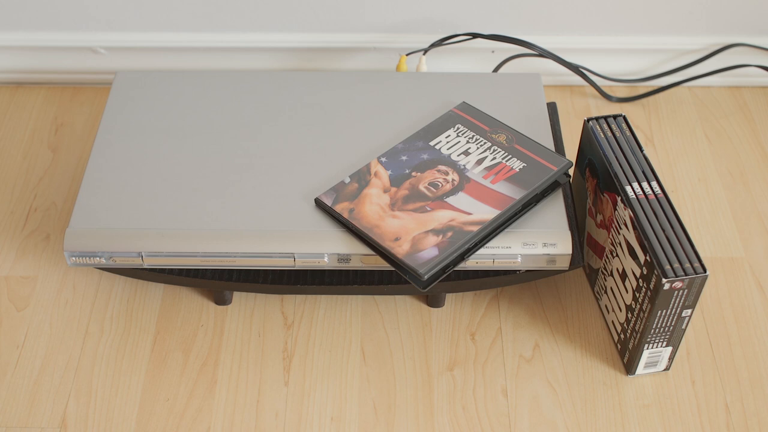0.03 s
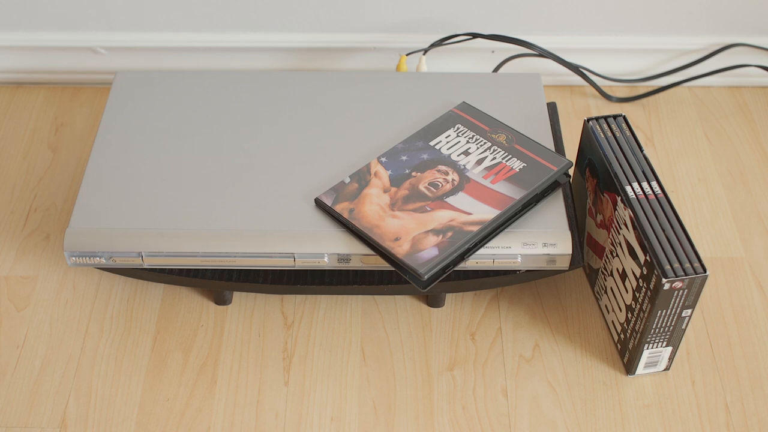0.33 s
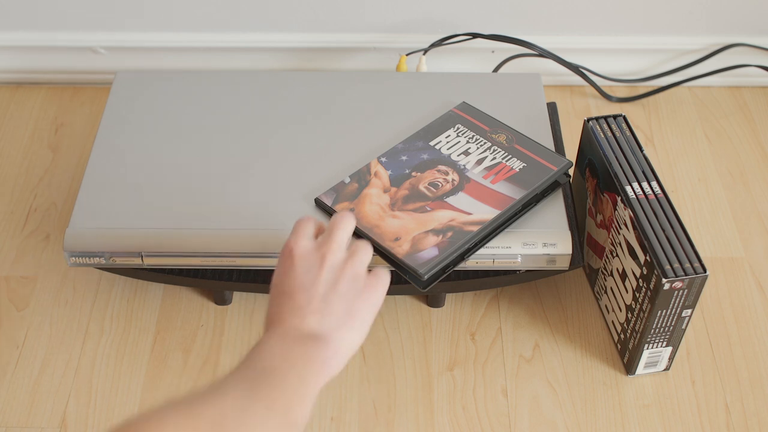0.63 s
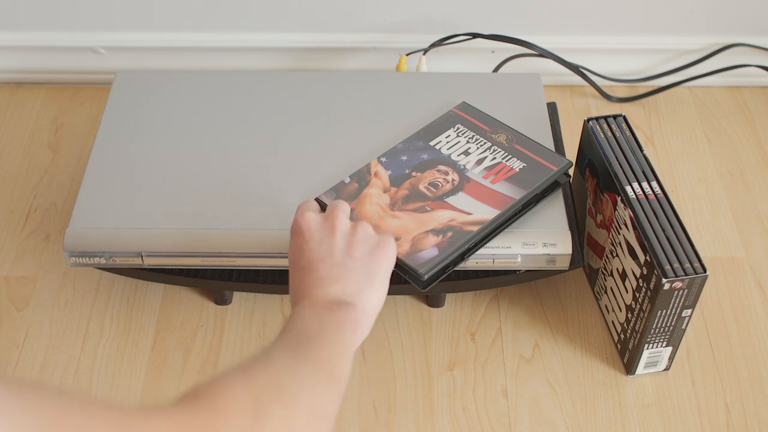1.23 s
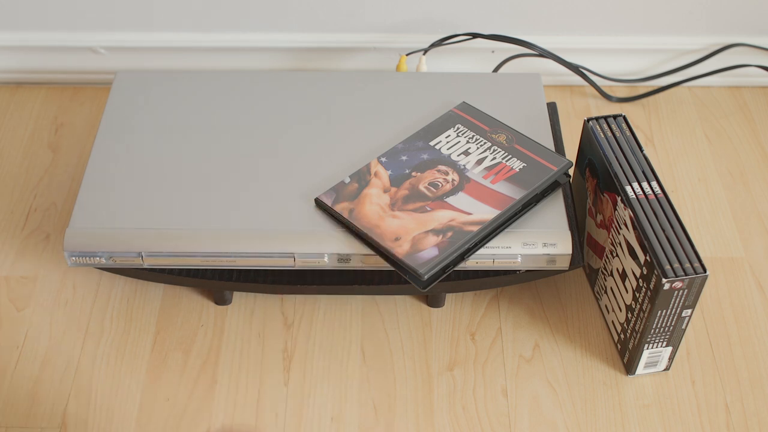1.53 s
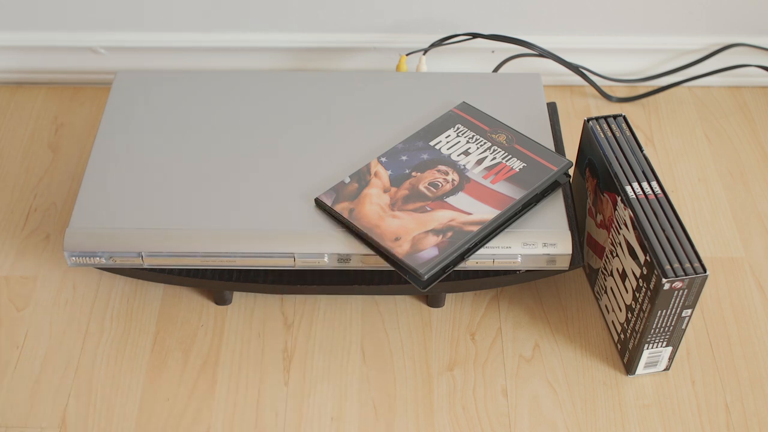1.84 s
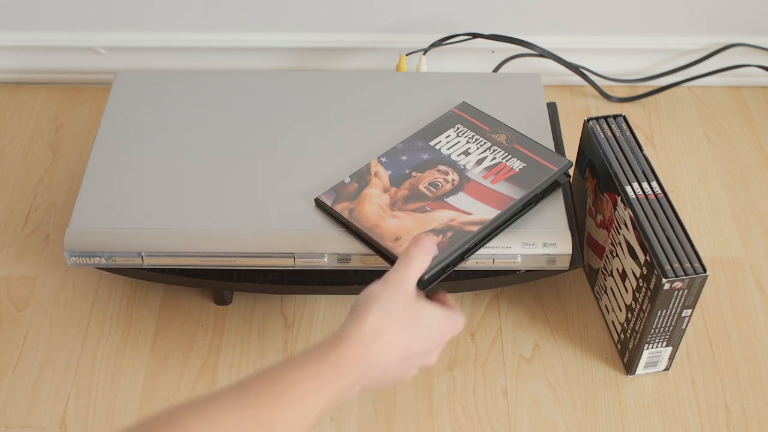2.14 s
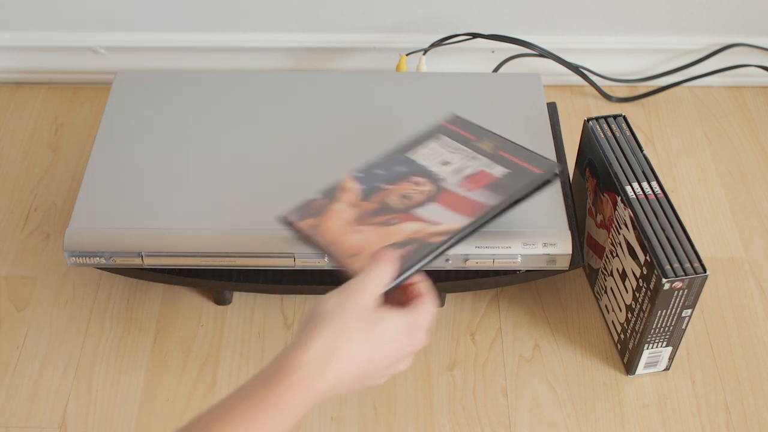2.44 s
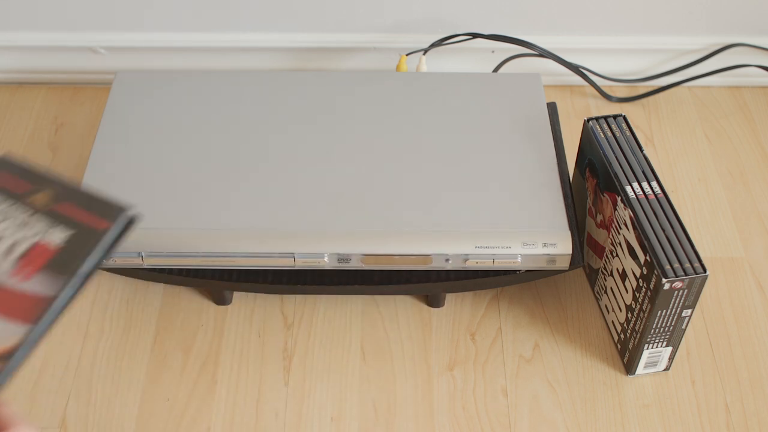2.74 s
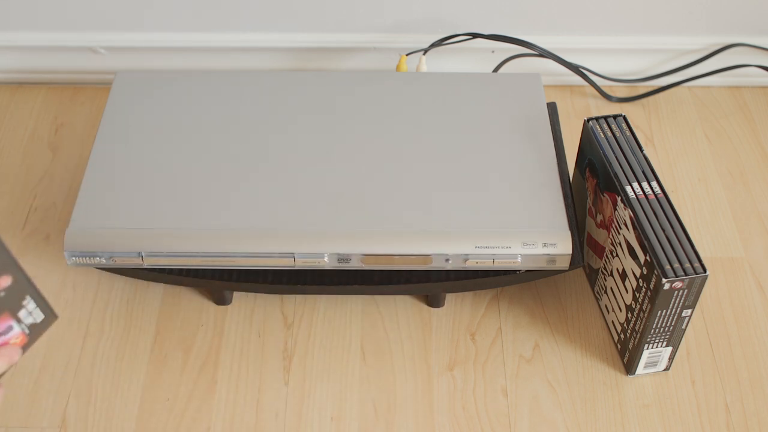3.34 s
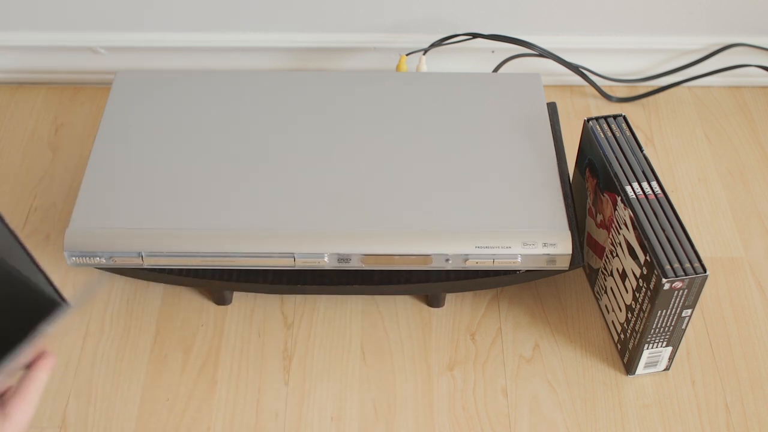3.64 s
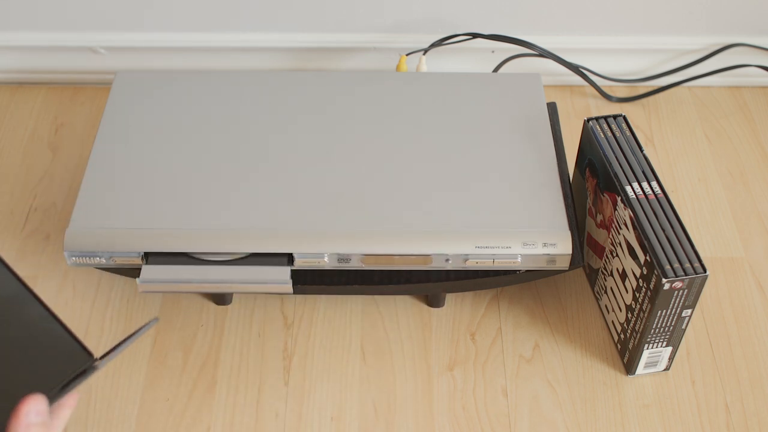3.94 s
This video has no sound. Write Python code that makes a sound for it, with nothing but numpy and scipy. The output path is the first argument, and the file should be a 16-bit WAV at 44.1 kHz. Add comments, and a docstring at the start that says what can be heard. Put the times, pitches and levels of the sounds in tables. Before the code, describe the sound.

A disc player buzzes faintly over a low electrical hum in a small room. Its eject button clicks at about 1.2 seconds, and from 1.4 the disc brakes in chirps that slow until 3.5. A plastic case scrapes off the lid around 2.4 seconds, is handled with soft rubs and snaps open at 3.2. From 3.7 the tray unlocks with a louder clatter and starts rolling out.

```python
"""A disc player on a wooden floor in a small room, over a mains hum. Its lens servo buzzes with every
turn of the disc until a finger clicks the eject button; the spindle is then braked in chirps that
come ever more slowly. Meanwhile a plastic case is dragged off the lid, handled and snapped open.
Last, the tray unlocks with a clatter and starts to roll out."""
import sys
import numpy as np
from scipy import signal
from scipy.fft import rfft, irfft, next_fast_len
from scipy.io import wavfile

SR = 44100
rng = np.random.default_rng(int(sys.argv[2]) if len(sys.argv) > 2 else 0)


def wav_record(signal):
    """Record a signal, one row per channel, as 16-bit PCM in the file named by sys.argv[1]."""
    frames = np.transpose(np.atleast_2d(signal))
    bounded = np.clip(frames, -1, 1)
    # unit amplitude maps onto the largest positive 16-bit level
    quanta = np.round(bounded * 32767).astype(np.int16)
    wavfile.write(sys.argv[1], SR, quanta)


N = 176400
TIME = np.arange(N) / SR
START_S, CHIRP_LEAD_S, CUTOFF_HZ = 0.061, 0.006, 15850


def from_db(db):
    """Decibels to gain."""
    return 10 ** (np.asarray(db) / 20)


def unit_rms(x):
    """Scale to rms 1."""
    return x / np.sqrt(np.mean(x ** 2) + 1e-20)


def coloured(x, points):
    """Minimum-phase filter through (frequency [Hz], gain [dB]) points."""
    size = next_fast_len(len(x) + 4096, real=True) // 2 * 2
    hz, db = np.transpose(sorted(points))
    curve_db = np.interp(np.log(np.fft.rfftfreq(size, 1 / SR) + 1), np.log(hz), db)
    cepstrum = irfft(np.log(from_db(curve_db)))
    cepstrum[1:size // 2] *= 2
    cepstrum[size // 2 + 1:] = 0
    return irfft(rfft(x, size) * np.exp(rfft(cepstrum)))[:len(x)]


def gate(on_s, off_s=np.inf, fade_s=0.011):
    """1 between two times, with linear fades."""
    return np.clip((TIME - on_s) / fade_s, 0, 1) * np.clip((off_s - TIME) / fade_s, 0, 1)


def swell(centre_s, sigma_s):
    """Gaussian envelope."""
    return np.exp(-.5 * ((TIME - centre_s) / sigma_s) ** 2)


def add(out, at_s, sound):
    """Mix a short sound in at a time."""
    i = min(max(int(at_s * SR), 0), N)
    out[i:i + len(sound)] += sound[:N - i]


def grit(size, spread_db):
    """Dense tiny contacts of uneven strength; rms 1."""
    strength = np.repeat(np.clip(rng.standard_normal(size // 16 + 1), -2, 2), 16)[:size]
    return unit_rms(rng.standard_normal(size) * from_db(spread_db * strength))


def body(x, modes):
    """Direct sound plus the modes it sets ringing."""
    out = x.copy()
    for hz, db, t60_s in modes:
        r = np.exp(-np.log(1000) / (t60_s * SR))
        feedback = [1, -2 * r * np.cos(2 * np.pi * hz / SR), r * r]
        out += from_db(db) * (1 - r * r) / 2 * signal.lfilter([1, 0, -1], feedback, x + 1e-18)
    return out


def chirp(hz, db, sigma_s, glide_hz_per_s):
    """Gliding Gaussian tone burst, centred CHIRP_LEAD_S into its buffer."""
    t = np.arange(-CHIRP_LEAD_S, CHIRP_LEAD_S, 1 / SR)
    cycles = hz * t + glide_hz_per_s * t * t / 2 + rng.random()
    return from_db(db) * np.exp(-.5 * (t / sigma_s) ** 2) * np.sin(2 * np.pi * cycles)


def blows(rows, attack_s, grit_db, low_db, top_db):
    """Each blow is a dying flurry of tiny contacts, whitened, then coloured by its hardness."""
    out, t = np.zeros(N), np.arange(SR // 8) / SR
    for at_s, db, bass_db, presence_db, treble_db, decay_s in rows:
        envelope = (1 - np.exp(-t / attack_s)) * np.exp(-t / decay_s)
        flurry = grit(len(t), grit_db) * envelope
        white = irfft(np.exp(1j * np.angle(rfft(flurry))), len(t))
        edge_db = (presence_db + treble_db) / 2 + 4.5  # bright edge of hard plastic
        colour = [(100.25, bass_db + low_db), (401, bass_db), (802, min(bass_db, 0) / 2 - 3),
                  (1620, 0), (4860, presence_db), (6440, edge_db),
                  (10200, treble_db), (CUTOFF_HZ, treble_db + top_db)]
        blow = coloured(white * (1 - t / t[-1]) ** 2, colour)
        onset_rms = np.sqrt(np.sum(blow ** 2) / (decay_s * SR / 2))
        add(out, at_s, from_db(db) * blow / onset_rms)
    return out


# mains partials: (frequency [Hz], rms level [dB])
HUM_PARTIALS = [(59.5, -52), (119, -72.5), (179, -75.5), (238, -78.5), (297, -81.5), (357, -82)]
# room noise: (frequency [Hz], gain [dB])
NOISE_COLOUR = [(15, -22.5), (25, -16.5), (48, -8.5), (69, -7), (89, -14), (110, -13), (684, -30.5),
                (871, -31.5), (1270, -36.5), (1850, -38.5), (2170, -33.5), (2490, -38), (3440, -42),
                (11500, -48.5), (15500, -43)]


def background(noise_db=-62.5):
    """Mains hum and room noise."""
    hum = sum(np.sqrt(2) * from_db(db) * np.sin(2 * np.pi * (hz * TIME + rng.random()))
              for hz, db in HUM_PARTIALS)
    return hum + from_db(noise_db) * unit_rms(coloured(rng.standard_normal(N), NOISE_COLOUR))


# disc flaws: (position [turns], pitch [Hz], level [dB], glide [Hz/s])
DISC_FLAWS = [(.02, 10140, -61, -900000), (.31, 4600, -63, 60000), (.315, 8040, -75, 100000),
              (0.314, 11800, -66, -500000), (.455, 12000, -56.5, 600000), (.47, 7900, -62.5, 200000),
              (.497, 13800, -61, 30000), (.515, 11600, -65.5, -1000000), (.535, 8670, -63, -150000),
              (.965, 13500, -59, 20000), (.975, 8300, -60, 300000)]
# servo hiss: (frequency [Hz], gain [dB])
SERVO_COLOUR = [(1500, -5.5), (2200, 0.5), (2900, -15), (3450, -4.5), (3700, 3.5), (4150, -16.5),
                (4700, -1), (5400, -8.5), (5950, -5), (6280, 4), (6650, -6), (7100, -9.5), (8400, -3),
                (9400, -13), (11000, -3), (15500, -1.5)]


def servo(turn_s=0.029842, first_turn_s=0.0403, off_s=1.376, hiss_db=-67.5):
    """The lens follows the same roughness and is jolted by the same flaws on every turn."""
    turn_samples = int(turn_s * SR)
    roughness = np.resize(rng.standard_normal(turn_samples), N) + 0.3 * rng.standard_normal(N)
    out = from_db(hiss_db) * unit_rms(coloured(roughness, SERVO_COLOUR))
    for position, hz, db, glide in DISC_FLAWS:
        jolt = chirp(hz, db, sigma_s=0.00049, glide_hz_per_s=glide)
        for turn_start_s in np.arange(first_turn_s, off_s, turn_samples / SR):
            at_s = turn_start_s + position * turn_s
            add(out, at_s - CHIRP_LEAD_S, jolt * from_db(rng.normal(0, 1)))
    return out * gate(START_S, off_s)


# strokes: (centre [s], sigma [s], level [dB])
RUB_STROKES = [(.32, 0.036, -64), (.92, 0.013, -71), (1.81, 0.034, -76.5), (2.66, 0.02, -67.5),
               (2.744, 0.017, -67), (2.845, 0.01, -61.5), (2.903, 0.045, -63), (3.08, 0.048, -70),
               (3.134, 0.055, -67), (3.24, 0.047, -69.5), (3.36, 0.075, -70.5), (3.52, 0.011, -58.5),
               (3.599, 0.02, -66), (3.69, 0.02, -66.5)]
# friction: (frequency [Hz], gain [dB])
RUB_COLOUR = [(300, 2), (900, -3.5), (2000, 5), (4000, 3.5), (6500, 5), (10000, 0), (16000, -10.5)]


def rubs():
    """Skin and sleeve rub in soft strokes of fine friction."""
    envelope = sum(from_db(db) * swell(centre_s, sigma_s) for centre_s, sigma_s, db in RUB_STROKES)
    return envelope * unit_rms(coloured(grit(N, spread_db=2.5), RUB_COLOUR))


# finger and button: (time [s], level [dB], bass [dB], presence [dB], treble [dB], decay [s])
BUTTON_BLOWS = [(.884, -54, 22, -4, -16, 0.0097), (.966, -52, -4, -22, -26, 0.0065),
                (1.1715, -33.5, -9, -20, -19, 0.0036), (1.286, -46, 13.5, -23, -21, 0.008),
                (1.322, -52.5, -7, -15, -31, 0.013), (1.345, -54.5, -3, -19, -41, 0.014),
                (1.412, -58.5, 7, -6, -15, 0.0081), (1.505, -57.5, 14, -6, -11, .005)]
# front panel: (frequency [Hz], gain [dB], t60 [s])
PANEL_MODES = [(405, 7.5, .03), (608, 1.5, 0.062), (927, 9, 0.037), (1120, -3, 0.15), (1285, 5, 0.15),
               (1396, 11, 0.054), (1677, 5.5, 0.065), (1915, -1, 0.088), (2240, -4, 0.065),
               (2583, 6, 0.049), (6460, 5, 0.032)]


def eject_button():
    """Finger taps and the button's click ring the front panel."""
    return body(blows(BUTTON_BLOWS, attack_s=0.00028, grit_db=6, low_db=4, top_db=7), PANEL_MODES)


# braking: (time [s], chirp rate [1/s], level [dB])
SPIN_DOWN = [(1.38, 182, -57), (1.699, 170, -58), (2.0, 137, -58.5), (2.299, 107, -57.5), (2.55, 89, -60),
             (2.849, 75, -60.5), (3.101, 36, -59), (3.502, 31, -60)]


def spindle(chirp_hz=2201, overtone_hz=2650, brake_start_s=1.385, brake_cycle_s=0.05):
    """Each commutation of the slowing motor chirps while the pulsed brake is on; the pauses grow."""
    times_s, rates, levels_db = np.transpose(SPIN_DOWN)
    steps = np.floor(np.cumsum(np.interp(TIME, times_s, rates, left=0, right=0)) / SR)
    commutations_s = np.append(times_s[0] + CHIRP_LEAD_S, TIME[1:][np.diff(steps) > 0])
    duty = 0.91 - 0.1 * (commutations_s - times_s[0])
    braking = (commutations_s - brake_start_s) / brake_cycle_s % 1 < duty
    shape = dict(sigma_s=0.0018, glide_hz_per_s=-32000)
    out = np.zeros(N)
    for at_s in commutations_s[braking]:
        db = np.interp(at_s, times_s, levels_db) + rng.normal(0, 2.46)
        overtone = chirp(overtone_hz * (1 + rng.exponential(0.052)), db - 15.5, **shape)
        add(out, at_s - CHIRP_LEAD_S, chirp(chirp_hz, db, **shape) + overtone)
    return out


# knocks and snaps: (time [s], level [dB], bass [dB], presence [dB], treble [dB], decay [s])
CASE_BLOWS = [(2.299, -51.5, 15, -4, -27, 0.0034), (2.355, -51, -10, -15, -7, 0.0015),
              (2.372, -55.5, -2, -9, -20, 0.017), (2.382, -48.5, -3, -4.5, -43, 0.011),
              (2.415, -50.5, 1, -2, -21, .009), (2.922, -53, 6, -3, -7, 0.013),
              (3.025, -65, -20, -18, -23, 0.029), (3.062, -52.5, 12, -7, -12, 0.0049),
              (3.178, -60, -4, -16, -16, 0.016), (3.193, -48, 7, -7, -43, 0.0029),
              (3.1965, -34.5, -4.5, -6.5, -16.5, 0.003), (3.35, -65, -20, -15, -26, 0.045),
              (3.401, -52.5, -0.5, -13, -47, 0.0039), (3.507, -57, 1, -15, -31, .008),
              (3.525, -52, 5, -18, -14, .007)]
# plastic case: (frequency [Hz], gain [dB], t60 [s])
CASE_MODES = [(594, 1.9, 0.019), (973, 7.9, 0.018), (1370, 2, .07), (1937, 2.6, 0.036), (2340, 0.75, 0.017),
              (3150, 1, 0.038)]


def case_knocks():
    """The plastic case rings as it is handled and snapped open."""
    return body(blows(CASE_BLOWS, attack_s=0.00049, grit_db=-1.5, low_db=-15, top_db=-5), CASE_MODES)


# scrape envelope: (time [s], level [dB])
SCRAPE_LEVELS = [(2.34, -95), (2.375, -65), (2.40, -72), (2.418, -53.5), (2.45, -48.5), (2.46, -67),
                 (2.51, -67), (2.56, -102)]
# scrape: (frequency [Hz], gain [dB])
SCRAPE_COLOUR = [(300, -9), (1500, 2), (3000, 0), (6000, 1), (11000, -1), (16000, -10)]
# lid drumming: (frequency [Hz], gain [dB])
LID_COLOUR = [(90, -29), (160, 0), (230, 5.5), (400, -4.5), (700, -12), (2000, -31)]
# chassis, also rung by the tray: (frequency [Hz], gain [dB], t60 [s])
CHASSIS_MODES = [(111.7, 16.4, 0.19), (132, 7, 0.26), (214.9, 10, 0.28), (256.2, 8, 0.5), (325, 2.3, .3),
                 (384.4, 5.9, 0.24), (438, 10.6, 0.15), (504.7, 7.5, 0.65), (564, 3.5, 0.37),
                 (1095, 3.5, .15), (1176, -5, 0.3), (1477, 2.4, 0.14), (1695, 0.67, 0.16),
                 (2445, 0.93, 0.062)]


def case_drag(drum_db=-50):
    """The case scrapes over the lid, which drums as the case tips off it."""
    times_s, levels_db = np.transpose(SCRAPE_LEVELS)
    envelope = from_db(np.interp(TIME, times_s, levels_db)) * gate(times_s[0], times_s[-1])
    scrape = envelope * unit_rms(coloured(grit(N, spread_db=4.5), SCRAPE_COLOUR))
    tipping = swell(centre_s=2.445, sigma_s=0.047)
    lid = body(coloured(grit(N, spread_db=6.5), LID_COLOUR), CHASSIS_MODES)
    drum = unit_rms(tipping * lid) * np.sqrt(np.mean(tipping ** 2))
    return scrape + from_db(drum_db) * drum


# tray mechanism: (time [s], level [dB], bass [dB], presence [dB], treble [dB], decay [s])
LATCH_BLOWS = [(3.644, -55.5, -13, -13, -27, 0.014), (3.657, -46.5, 7.5, -5.5, -44, 0.0099),
               (3.718, -47.5, 2, -12, -27, 0.042), (3.735, -38.5, -1, -14, -23, 0.017),
               (3.744, -34, 3.5, -11.5, -29, .011), (3.763, -30, 2, -11, -18.5, 0.0073),
               (3.7725, -33, -17, 3, 1, .005), (3.778, -29.5, 14.5, -8, -32, 0.0075),
               (3.801, -35.5, -3, -17, -20, 0.0072), (3.8128, -26, 4.5, -14, -43, 0.0048),
               (3.838, -37.5, 24, -8, -23, 0.014), (3.853, -38.5, -1, -13, -22.5, 0.0066),
               (3.864, -38.5, 16, -11, -31, 0.013), (3.92, -53.5, -2, -22, -31, 0.018),
               (3.955, -50.5, -7, -18, -33, 0.0088)]
# gear noise: (frequency [Hz], gain [dB])
GEAR_COLOUR = [(53, -34), (90, -2), (439, -3.5), (659, -5.5), (1650, -17), (1920, -22), (3350, -15.5),
               (10900, -32), (13200, -19), (15000, -33)]


def tray(gear_db=-54, drop_hz=66.6, drop_db=-47, drop_decay_s=0.052, whine_hz=13100, whine_db=-84):
    """The latch clatters, gears roll, the drive drops on its rubber mounts and the motor whines."""
    latch = body(blows(LATCH_BLOWS, attack_s=0.0015, grit_db=2, low_db=-12, top_db=-16), CHASSIS_MODES)
    rolling = body(coloured(grit(N, spread_db=2), GEAR_COLOUR), CHASSIS_MODES)
    gears = from_db(gear_db) * gate(on_s=3.65, fade_s=0.043) * unit_rms(rolling)
    drop_age_s = np.maximum(TIME - 3.795, 0)
    bounce = drop_age_s / drop_decay_s * np.exp(1 - drop_age_s / drop_decay_s)
    drop = from_db(drop_db) * bounce * np.sin(2 * np.pi * drop_hz * drop_age_s)
    narrow_noise = signal.lfilter(*signal.iirpeak(whine_hz, Q=35, fs=SR), rng.standard_normal(N))
    whine = from_db(whine_db) * gate(on_s=3.86) * unit_rms(narrow_noise)
    return latch + gears + drop + whine


# reverberation: (frequency [Hz], gain [dB])
ROOM_COLOUR = [(100, -7), (450, 0.5), (1500, -1.5), (5000, -6.5), (14000, -18.5)]


def room(x, delay_s=0.012, t60_s=0.3, gain_db=-3.5):
    """The small room's diffuse, dull tail."""
    t = TIME[:SR // 2]
    tail = rng.standard_normal(len(t)) * np.exp(-np.log(1000) * t / t60_s) * (t > delay_s)
    wet = signal.fftconvolve(x, tail / np.linalg.norm(tail))[:N]
    return from_db(gain_db) * coloured(wet, ROOM_COLOUR)


def scene():
    """Mono mix, heard from above the player."""
    button, case = eject_button(), case_knocks()
    drive = servo() + spindle()
    friction_and_tray = case_drag() + rubs() + tray()
    direct = drive + button + case + friction_and_tray
    room_send = from_db(-1) * drive + from_db(-4) * button + from_db(-5.5) * case + friction_and_tray
    mix = direct + room(room_send) + background()
    return (mix * gate(START_S))[None]


def record(dry):
    """Steep elliptic low-pass."""
    return signal.sosfilt(signal.ellip(12, .1, 70, CUTOFF_HZ, fs=SR, output="sos"), dry)


dry = scene()
out = record(dry)
wav_record(out)
```